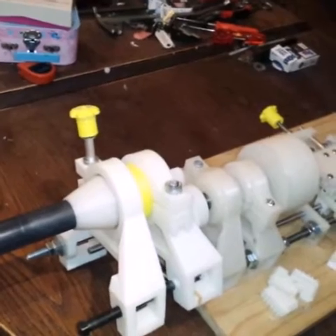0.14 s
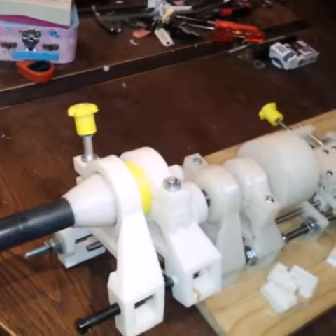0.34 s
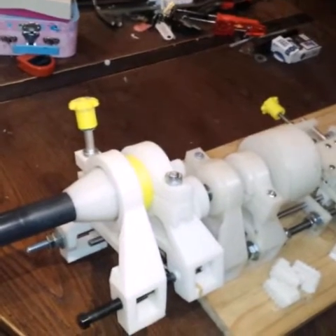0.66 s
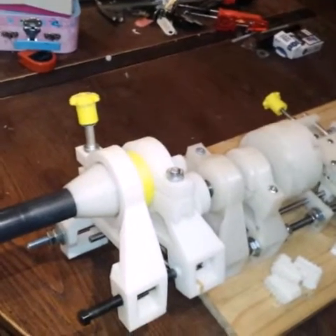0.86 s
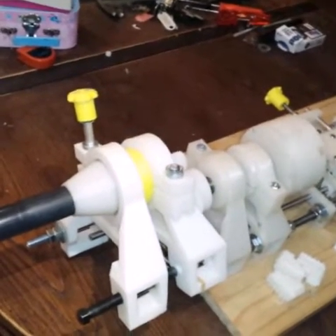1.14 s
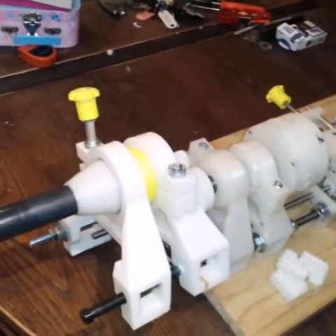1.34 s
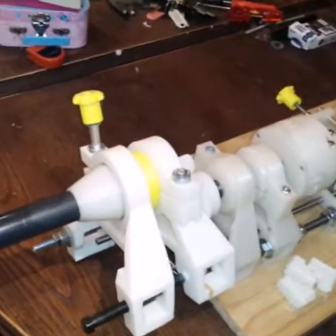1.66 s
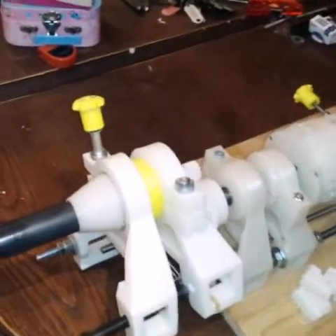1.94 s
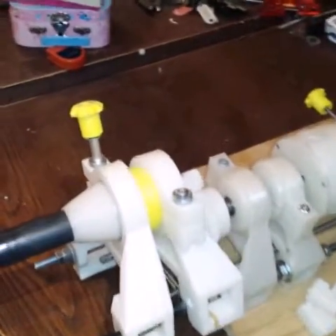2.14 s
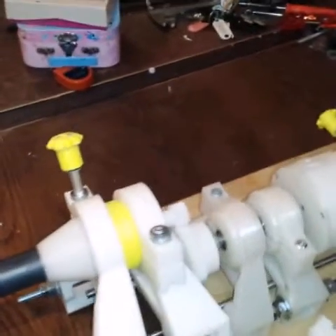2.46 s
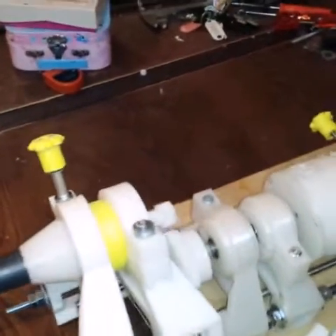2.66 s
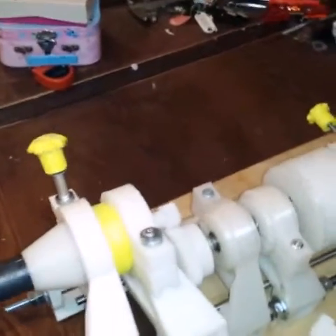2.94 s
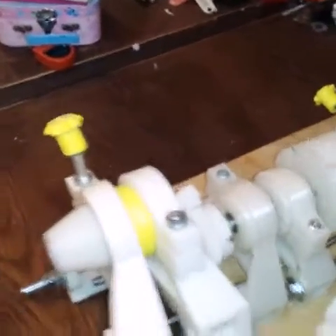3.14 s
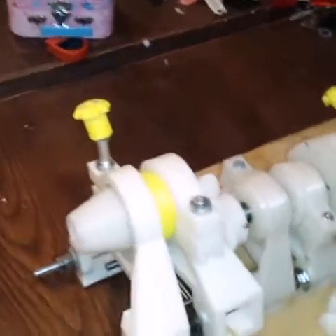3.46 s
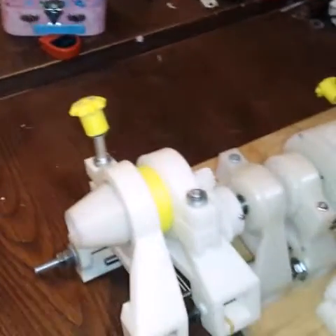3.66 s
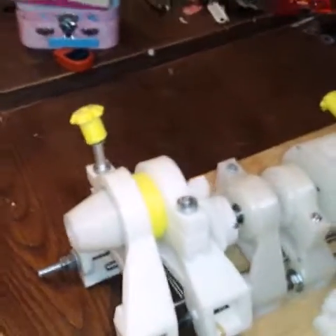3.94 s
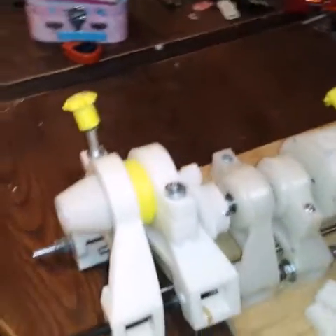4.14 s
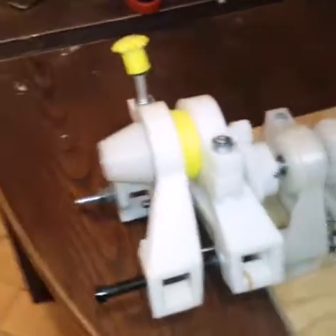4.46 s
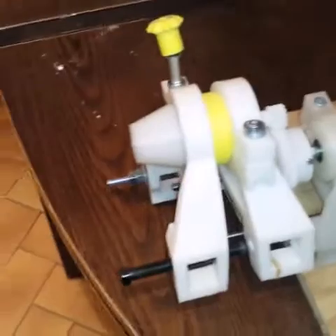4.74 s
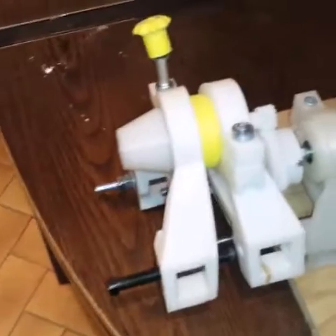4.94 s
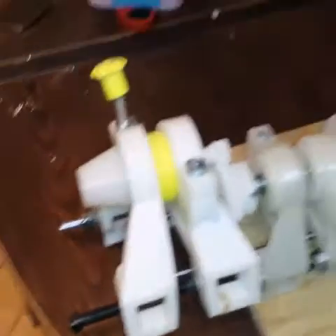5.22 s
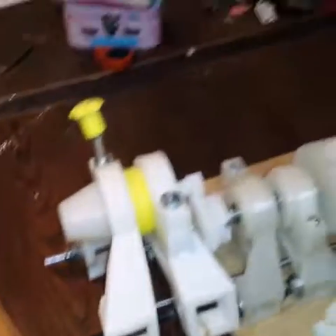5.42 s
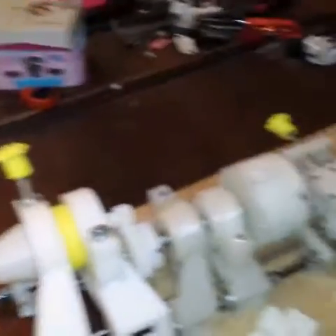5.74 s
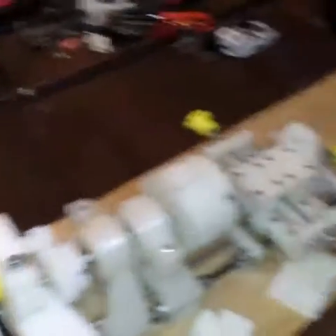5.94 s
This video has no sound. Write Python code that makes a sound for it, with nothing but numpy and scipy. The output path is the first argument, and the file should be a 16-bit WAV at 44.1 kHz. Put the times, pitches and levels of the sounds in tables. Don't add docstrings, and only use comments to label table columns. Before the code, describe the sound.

Air rushes and whistles around a hose as a motor sings evenly; a pop of release, duller roar, then a sinking, echoing whine.

```python
import sys
import numpy as np
from scipy import signal
from scipy.fft import rfft, irfft, next_fast_len
from scipy.io import wavfile
from scipy.ndimage import uniform_filter1d, map_coordinates

SR = 44100
rng = np.random.default_rng(int(sys.argv[2]) if len(sys.argv) > 2 else 0)


def output_pcm(signal):
    pcm = np.clip(np.atleast_2d(signal).T, -1, 1) * 32767
    wavfile.write(sys.argv[1], SR, np.round(pcm).astype(np.int16))


def volts_from_decibels(level):
    exponent = np.asarray(level, float) / 20
    return 10 ** exponent


N = 268415
FRAME = 512
HZ = np.fft.rfftfreq(FRAME, 1 / SR)[:, None]
TIMES = np.arange(-(-N // (FRAME // 2)) + 1) * (FRAME // 2) / SR
CLOCK = np.arange(N) / SR
SWITCH_OFF, DRAG = 4.975, .83
PATCHY_DB = 2.5

# (time [s], level [dB], left over right [dB])
RUNNING = [(0, -12, 3), (.44, -11.5, 2), (1.45, -11.5, 2), (1.66, -10.5, 2), (2.09, -12.5, 1),
           (2.26, -11.5, .5), (2.63, -14, 1), (2.68, -20.5, 1.5), (2.86, -15.5, 0), (3.5, -21, 0),
           (3.81, -15, -2), (4.18, -10.5, -1), (4.66, -11, -1), (4.76, -13, -.5), (4.91, -10, 0),
           (4.97, -11.5, -5.5)]


def along(points, hz):
    f, v = np.transpose(points)
    return np.interp(np.log(hz + 1), np.log(f + 1), v)


def curves(rows, t):
    s, *cols = np.transpose(rows)
    return [np.interp(t, s, c) for c in cols]


def gate(t, start, end, fade):
    return np.clip(np.minimum(t - start, end - t) / fade, 0, 1)


def wobble(rate):
    return map_coordinates(rng.standard_normal(int(N * rate / SR) + 4), [CLOCK * rate])


def slowdown(t):
    return 1 + DRAG * np.clip(t - SWITCH_OFF, 0, None)


def slowing(t):
    return np.log2(slowdown(t))


def shaft_hz(t):
    # (time [s], turns a second [Hz])
    speed = [(0, 364.6), (.4, 364.2), (1.2, 363.7), (2.3, 363.4), (3.0, 362.5), (3.45, 361), (3.9, 360.6),
             (4.3, 360.6), (4.97, 361.3)]
    return curves(speed, t)[0] / slowdown(t)


def air(gain, pan_db, alike, patchy_db):
    # (time [s], delay [samples])
    arrival = [(0, 9), (2, 9.4), (2.6, 10), (3.2, 13.8), (4, 14.66), (5.2, 14.9), (6.09, 11.3)]
    z = signal.stft(rng.standard_normal((3, N)), nperseg=FRAME)[2][..., :len(TIMES)]
    patches = uniform_filter1d(rng.standard_normal(z.shape), size=3, axis=1)
    patches = uniform_filter1d(patches, size=30, axis=2)
    z = z * volts_from_decibels(patchy_db * patches / patches.std())
    half_lag = np.exp(-1j * np.pi * HZ / SR * curves(arrival, TIMES)[0])
    alike = np.clip(alike, 0, 1)
    shared = np.sqrt(alike) * z[0]
    own = np.sqrt(1 - alike) * z[1:]
    left = (shared * half_lag + own[0]) * volts_from_decibels(pan_db / 2)
    right = (shared / half_lag + own[1]) * volts_from_decibels(-pan_db / 2)
    return signal.istft(gain * np.array([left, right]), nperseg=FRAME)[1][:, :N]


def banded(colour, bands, levels_db):
    shape = volts_from_decibels(along(colour, HZ))
    power = [np.sum(shape[(HZ >= lo) & (HZ < hi)] ** 2) / len(HZ) for lo, hi in bands]
    lift = np.array(levels_db) - 10 * np.log10(power)[:, None]
    centres = np.log(np.sqrt(np.prod(bands, axis=1)))
    weights = [np.interp(np.log(HZ + 1), centres, row) for row in np.eye(len(bands))]
    return shape * volts_from_decibels(sum(w * db for w, db in zip(weights, lift)))


def resonance(hz, level, pan_db, sharpness):
    power = 1 / np.square(np.square(1 + np.square(sharpness * (HZ / hz - 1))))
    power = power * level ** 2 / np.mean(power, axis=0)
    return power * volts_from_decibels(np.array([pan_db, -pan_db]))[:, None, None]


def edge_tones(rows, pan_db, fade_s, sharpness):
    total = 0
    for start, end, from_hz, to_hz, db in rows:
        hz = np.interp(TIMES, [start, end], [from_hz, to_hz])
        total = total + resonance(hz, volts_from_decibels(db) * gate(TIMES, start, end, fade_s), pan_db, sharpness)
    return total


def room(x, t60):
    t = CLOCK[:SR]
    mid, side = rng.standard_normal((2, SR)) * volts_from_decibels(-60 * t / t60) * (1 - np.exp(-t / 0.009))
    tails = np.array([mid + 0.19 * side, mid - 0.35 * side]) / np.linalg.norm(mid)
    return signal.fftconvolve(x[None], tails, axes=1)[:, :N]


def room_modes(x):
    # (frequency [Hz], level [dB], left over right [dB])
    modes = [(352, 2, 7), (338.3, 3, -4), (324, 4.5, 4), (308.5, 2, 2.5), (294.5, 3, 3), (286.6, 1.5, 0),
             (268, -5, 3), (261.4, 0, -3), (249.6, -8, -5), (233, -10, 1), (223, -14, 2), (206, -2.5, 1.5),
             (189, -3, 1)]
    direct_db, width_hz = -32, 5.3
    size = next_fast_len(N + SR)
    f = np.fft.rfftfreq(size, 1 / SR)
    response = volts_from_decibels(direct_db)
    for hz, db, pan_db in modes:
        ring = 1j * f * width_hz / (hz * hz - f * f + 1j * f * width_hz)
        response = response + volts_from_decibels(db + np.array([[pan_db], [-pan_db]]) / 2) * ring
    return irfft(rfft(x, size) * response, size)[:, :N]


def rumble():
    # (frequency [Hz], level [dB])
    colour = [(20, -49), (40, -26), (70, -12.5), (130, -7.5), (170, -6.5), (250, -7.5), (330, 0),
              (450, -10.5), (600, -7.5), (900, -22)]
    # (frequency [Hz], width [Hz], level [dB])
    hum_bands = [
        (101, 5, 14),
        (200, 8, 10),
        (258, 14, 4),
    ]
    # (start [s], end [s], level [dB])
    dip = (2.27, 2.8, -21)
    size = next_fast_len(N)
    f = np.fft.rfftfreq(size, 1 / SR)
    hum = sum(volts_from_decibels(db) / (1 + (2 * (f - hz) / width) ** 2) for hz, width, db in hum_bands)
    spectrum = rfft(rng.standard_normal((2, size))) * volts_from_decibels(along(colour, f)) * (1 + hum)
    mid, side = irfft(spectrum, size)[:, :N]
    near_db = curves(RUNNING, CLOCK)[0] - RUNNING[0][1]
    start, end, dip_db = dip
    dip_depth = np.clip((CLOCK - start) / (end - start), 0, 1) ** 3 * gate(CLOCK, -1, end, .025)
    db = -42.5 + .9 * near_db - 9 * slowing(CLOCK) + dip_db * dip_depth
    lumps = volts_from_decibels(db + 9.5 + 1.12 * wobble(9.3)) / mid.std()
    return lumps * np.array([mid + 0.34 * side, mid - .38 * side])


def free_rush():
    # (time [s], air flow [dB])
    flow = [(2.8, 1.5), (2.9, -7.5), (3.35, -8), (3.6, -8), (3.9, -2), (4.2, 0), (4.8, -0.35), (5.3, 0.75),
            (6.09, -0.4)]
    # (level [dB], share of the flow, change per octave of slowing [dB])
    flow_bands = [
        (-33.5, 1.13, 1),
        (-34.5, 0.92, -8.5),
        (-30, 1.02, -1.1),
        (-35, 0.92, -14),
        (-51.5, 0.43, -12),
    ]
    # (frequency [Hz], level [dB])
    colour = [(250, -39), (420, -2.5), (520, -6.5), (700, -5.5), (1100, -3.5), (1400, -12), (2600, -5.5),
              (4100, -7.5), (5300, -2.5), (7500, -6), (9500, -7.5), (11500, -12.5), (12800, -18.5),
              (14500, -24)]
    # (frequency [Hz], left over right [dB])
    side = [(400, 0), (800, -.5), (1200, .5), (2200, 5), (3200, 3), (4200, -2), (5500, 0), (7000, 1),
            (9500, 0), (11500, -4), (12300, -6), (12700, -16), (14500, -17)]
    # (frequency [Hz], share common to both ports)
    alike = [(300, .9), (700, .65), (1500, .6), (5000, .55), (8000, .35), (14000, .25)]
    flow_db, = curves(flow, TIMES)
    levels_db = [db + share * flow_db + sink_db * slowing(TIMES) for db, share, sink_db in flow_bands]
    bands = [(600, 1200), (1300, 1800), (2000, 4500), (8500, 11500), (12500, 14500)]
    gain = banded(colour, bands, levels_db) * volts_from_decibels(4.5) * gate(TIMES, 2.78, 7, 0.033)
    return air(gain, along(side, HZ), along(alike, HZ), PATCHY_DB)


def gap_rush():
    # (time [s], air flow [dB])
    leak = [(0, 2), (.6, 0), (1.4, 0.7), (1.85, 2.5), (2.1, 3), (2.27, 2), (2.45, 5), (2.56, 6.5),
            (2.64, 6.5), (2.8, 6)]
    # (level [dB], share of the flow it follows)
    leak_bands = [
        (-37.5, -0.77),
        (-28, 1.19),
        (-31, 0.27),
    ]
    # (frequency [Hz], level [dB])
    colour = [(250, -36), (420, -7.5), (617, -5.5), (684, -7), (867, -5.5), (1250, -2.5), (1740, -4),
              (2040, 0), (4540, -4), (5110, -4), (6470, 2), (7180, 1.5), (8320, 0.5), (11500, -4.5),
              (14400, -15)]
    # (frequency [Hz], left over right [dB])
    side = [(400, 1), (1200, .5), (2300, 4), (3500, 1), (5000, -1), (6700, 2), (8500, -4), (9500, -3),
            (10500, -5), (11500, -8), (12300, -10), (12800, -18), (14500, -18)]
    # (frequency [Hz], share common to both ports)
    alike = [(300, .9), (700, .55), (1500, .3), (5000, .3), (7000, .5), (11500, .45), (14000, .4)]
    hose_free_s = 2.815
    flow_db, = curves(leak, TIMES)
    levels_db = [db + share * flow_db for db, share in leak_bands]
    gain = banded(colour, [(500, 1100), (1800, 5800), (6000, 7800)], levels_db)
    gain = gain * gate(TIMES, -1, hose_free_s, .025) * volts_from_decibels(4.0)
    return air(gain, along(side, HZ), along(alike, HZ), PATCHY_DB)


def whistles():
    # (start [s], end [s], from [Hz], to [Hz], level [dB])
    slit = [(-.05, 1.12, 14400, 14600, -29), (1.17, 1.22, 13000, 12700, -29),
            (1.23, 1.67, 14400, 14200, -32), (1.665, 1.72, 14000, 9700, -23.5),
            (1.71, 2.005, 9750, 9700, -23.5), (2.0, 2.19, 8500, 8650, -24), (2.19, 2.3, 11500, 11300, -29),
            (2.19, 2.3, 10300, 10300, -30), (2.3, 2.44, 10500, 10700, -24.5),
            (2.42, 2.54, 10700, 11800, -28), (2.58, 2.635, 13800, 12000, -32),
            (2.62, 2.815, 11000, 10500, -29.5), (2.62, 2.815, 9300, 9500, -28)]
    to_left = [
        (1.72, 2.25, 6600, 6860, -32),
        (2.95, 3.5, 7260, 7100, -33.5),
        (3.38, 3.97, 6800, 7140, -28),
    ]
    to_right = [
        (3.55, 3.9, 7200, 7840, -29.5),
        (3.84, 3.98, 7100, 5500, -33),
        (3.55, 4.2, 4970, 4970, -33),
        (4.28, 4.52, 4200, 4240, -28.5),
        (4.42, 5.09, 5100, 5250, -26),
        (5.02, 5.3, 4250, 4150, -25),
        (5.2, 5.5, 4240, 4100, -33),
    ]
    shell = [
        (4.88, 5.085, 2620, 2540, -31.5),
    ]
    rim = [
        (2.19, 2.55, 11900, 11800, -31),
        (2.2, 2.47, 9000, 9600, -30),
    ]
    power = edge_tones(slit, -6, 0.0088, sharpness=9.6)
    power = power + edge_tones(to_left, 2.7, 0.1, sharpness=9.4)
    power = power + edge_tones(to_right, -2.5, 0.04, sharpness=9.4)
    power = power + edge_tones(shell, 4.5, 0.036, sharpness=19)
    power = power + edge_tones(rim, -5, .02, sharpness=24)
    blades = volts_from_decibels(-27.5) * gate(TIMES, 4.86, 7, 0.87) * gate(TIMES, 0, 6.04, 0.32)
    power = power + resonance(13.1 * shaft_hz(TIMES), blades, pan_db=9, sharpness=5.6)
    return air(np.sqrt(power), 0, .6, PATCHY_DB)


def cavity_song():
    # (time [s], pitch [Hz], level [dB])
    cavity = [(2.41, 624, -36), (2.474, 886, -32), (2.522, 1098, -28), (2.58, 1253, -24), (2.62, 1330, -24),
              (2.67, 1435, -23), (2.7, 1440, -36)]
    hz, db = curves(cavity, CLOCK)
    song = np.sin(2 * np.pi * np.cumsum(hz * (1 + 0.0144 * wobble(150))) / SR)
    song = song * volts_from_decibels(db + 4 + 1.5 * wobble(80)) * gate(CLOCK, 2.43, 2.79, .07)
    return np.array([np.roll(song, 11), song])


def hose_thump():
    # (time [s], frequency [Hz], level [dB], time to fall 60 dB [s])
    hose = [
        (2.775, 305, -18, 0.31),
        (1.8, 230, -38, 0.27),
    ]
    thump = np.zeros(N)
    for s, hz, db, t60 in hose:
        t = np.clip(CLOCK - s, 0, None)
        thump += volts_from_decibels(db - 60 * t / t60) * (1 - np.exp(-t / 0.0074)) * np.sin(2 * np.pi * hz * t)
    return thump


def seal_gulps():
    # (time [s], level [dB], rise [s], time to fall 60 dB [s])
    gulp_rows = [
        (2.672, -12.5, .005, .13),
        (2.75, -15, .004, .09),
        (2.785, -27, .01, .11),
    ]
    # (frequency [Hz], level [dB])
    gulp_colour = [(350, -49), (600, -21), (966, 4), (1140, 3), (2410, -1), (3980, -13), (4290, 3),
                   (12000, -28), (15600, -45), (22000, -120)]
    puffs = np.zeros(len(TIMES))
    for s, db, rise, t60 in gulp_rows:
        t = np.clip(TIMES - s, 0, None)
        puffs += volts_from_decibels(db - 60 * t / t60) * (1 - np.exp(-t / rise))
    colour = volts_from_decibels(along(gulp_colour, HZ))
    return air(colour / np.sqrt(np.mean(colour ** 2)) * puffs, .5, .25, PATCHY_DB)


def motor():
    # (multiple of the shaft, level [dB], rise [s])
    overtones = [
        (2, -32.5, 0.56),
        (3, -32.5, 1),
        (4, -38, 0.56),
    ]
    # (multiple of the shaft, level against the shaft tone [dB])
    fan_orders = [
        (6, -36),
        (12, -35),
    ]
    standing_t60 = .14
    driven_db = -47.5
    hz, coasting = shaft_hz(CLOCK), np.clip(CLOCK - SWITCH_OFF, 0, None)
    db, pan_db = curves(RUNNING, CLOCK)
    db = db - 60 * coasting / standing_t60
    turn = 2 * np.pi * np.cumsum(hz) / SR
    lag = 2 * np.pi * hz * 3 / SR
    level = volts_from_decibels(db + 0.068 * wobble(15)) * np.sqrt(2)
    tone = level * np.array([volts_from_decibels(pan_db / 2) * np.sin(turn - lag), volts_from_decibels(-pan_db / 2) * np.sin(turn)])

    glide = gate(CLOCK, 4.96, 7, 0.047) * np.sqrt(2) * np.sin(turn)
    tone += room_modes(volts_from_decibels(-21.5) * glide)
    tone += room(volts_from_decibels(-22.0) * (hz / hz[0]) ** 3.3 * glide, t60=0.89)

    for order, top_db, rise in overtones:
        over_db = driven_db + (top_db - driven_db) * np.clip(coasting / rise, 0, 1)
        tone += room(volts_from_decibels(over_db - 6.0) * np.sin(order * turn), t60=0.65)
        for port in tone:
            port += volts_from_decibels(over_db + 4.4 * wobble(18)) * np.sin(order * turn + 0.43 * wobble(17))
    for order, over_db in fan_orders:
        for port in tone:
            port += volts_from_decibels(db + over_db + 5 * wobble(11)) * np.sin(order * turn + 0.6 * wobble(11))
    return tone


def scene():
    release = cavity_song() + hose_thump() + seal_gulps()
    return rumble() + free_rush() + gap_rush() + whistles() + release + motor()


def thin_treble(x):
    # (frequency [Hz], level per bin [dB])
    audible = [(8000, -80), (10500, -64.5), (12000, -62), (14500, -59.5)]
    hz, _, z = signal.stft(x, SR, nperseg=2 * FRAME)
    power = uniform_filter1d(np.abs(z) ** 2, size=7, axis=1)
    scatter = uniform_filter1d(rng.standard_normal(z.shape[1:]), size=7, axis=0)
    scatter = uniform_filter1d(scatter, size=3, axis=1)
    limit = volts_from_decibels(along(audible, hz) + np.array([[5.5], [0]]))[..., None]
    limit = limit * volts_from_decibels(2.2 * scatter / scatter.std())
    return signal.istft(z * (power > limit ** 2), SR, nperseg=2 * FRAME)[1][:, :N]


def top_cut(x):
    return signal.sosfilt(signal.butter(12, 14530, fs=SR, output="sos"), x)


def record(dry):
    soft = dry / (1 + np.abs(dry / 1.05) ** 6) ** (1 / 6)
    return top_cut(thin_treble(soft))


dry = scene()
out = record(dry)
output_pcm(out)
```